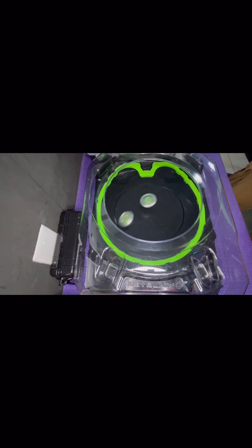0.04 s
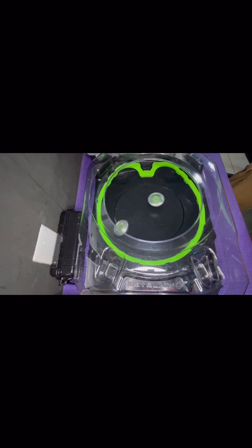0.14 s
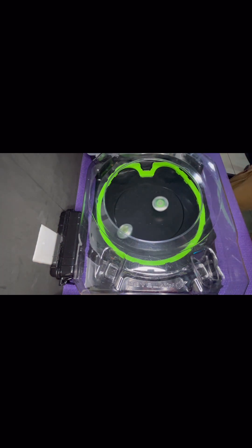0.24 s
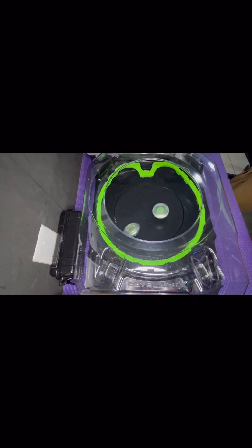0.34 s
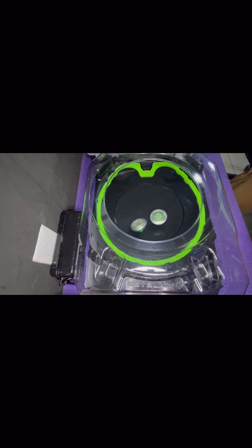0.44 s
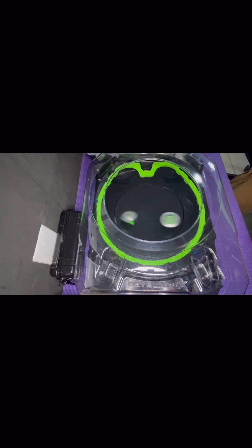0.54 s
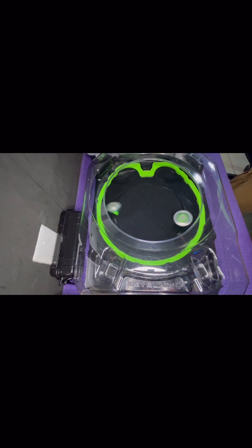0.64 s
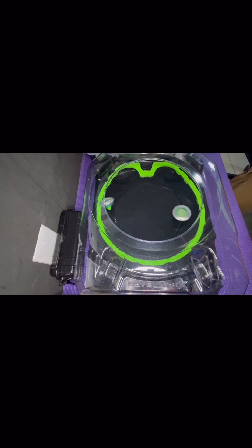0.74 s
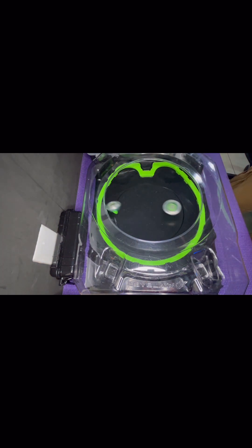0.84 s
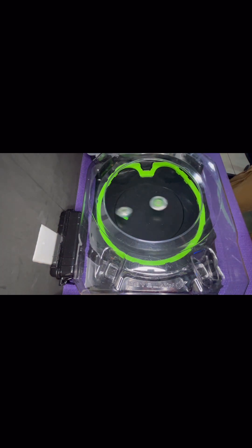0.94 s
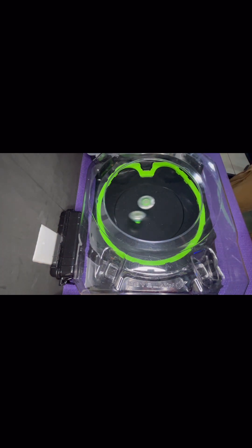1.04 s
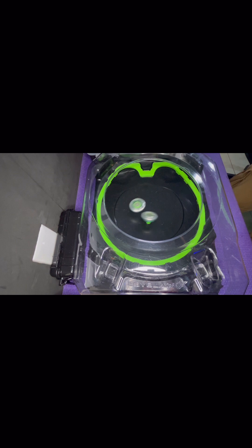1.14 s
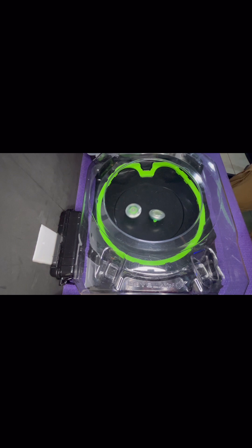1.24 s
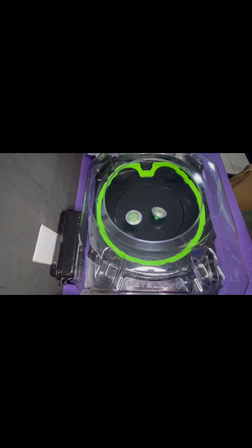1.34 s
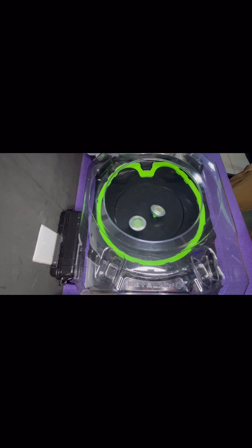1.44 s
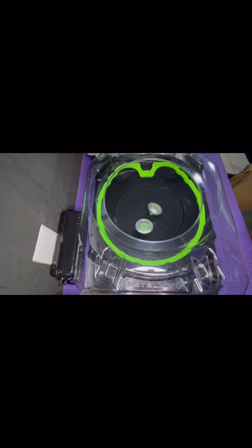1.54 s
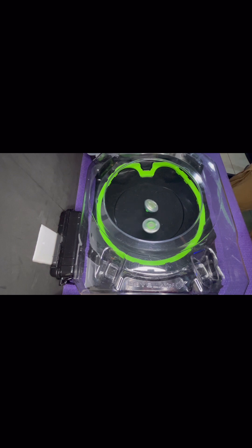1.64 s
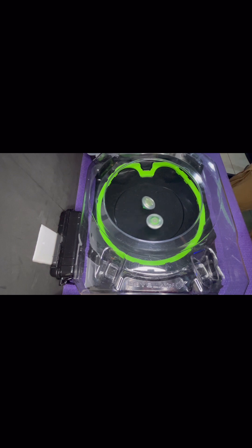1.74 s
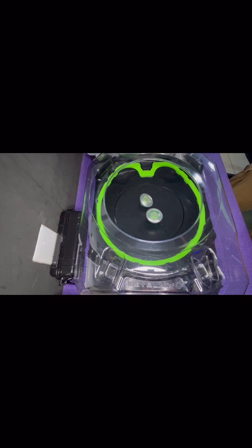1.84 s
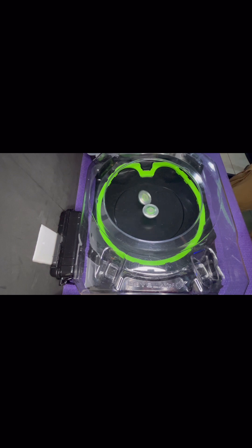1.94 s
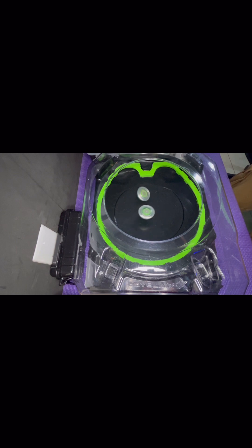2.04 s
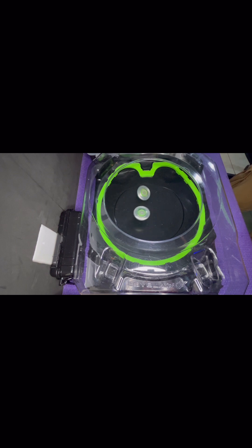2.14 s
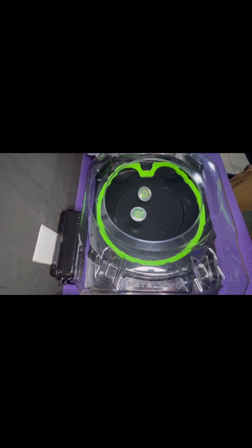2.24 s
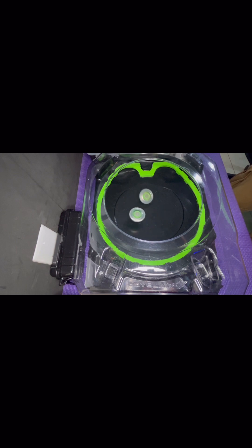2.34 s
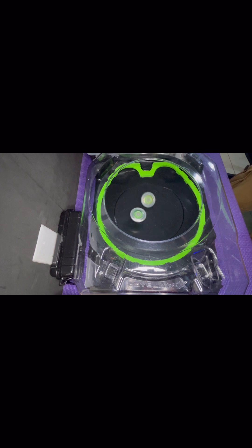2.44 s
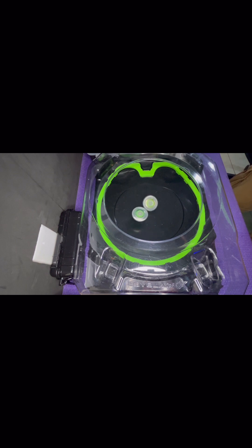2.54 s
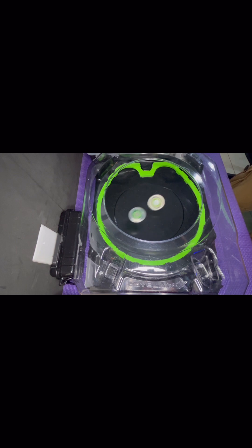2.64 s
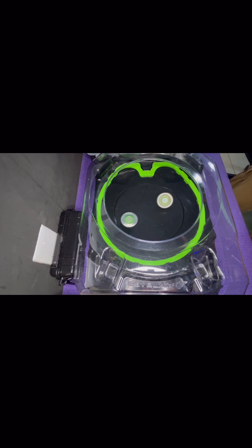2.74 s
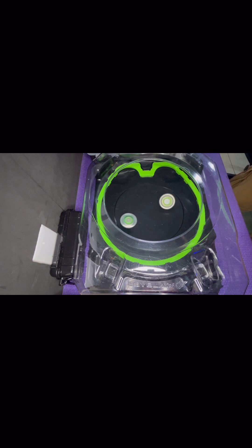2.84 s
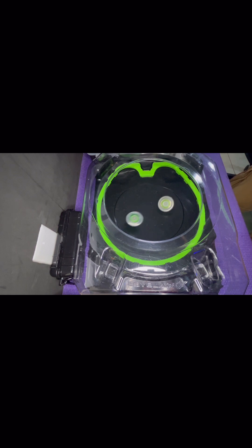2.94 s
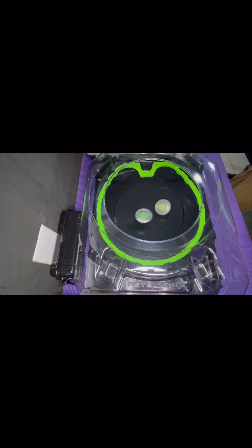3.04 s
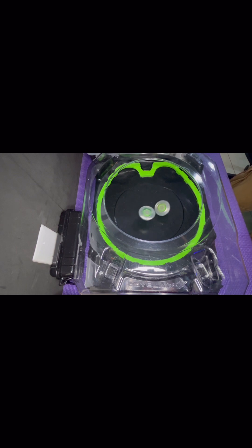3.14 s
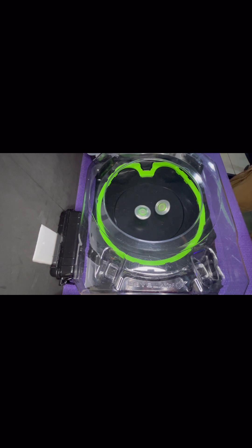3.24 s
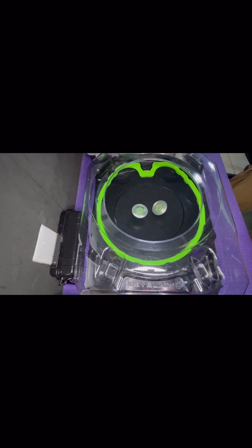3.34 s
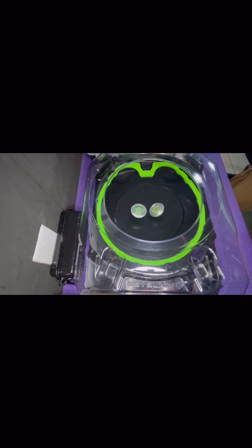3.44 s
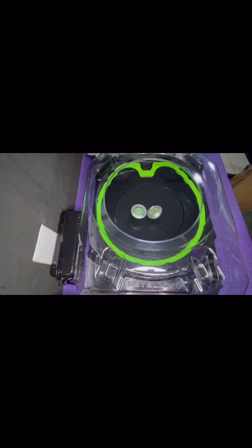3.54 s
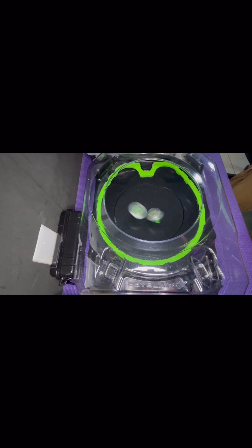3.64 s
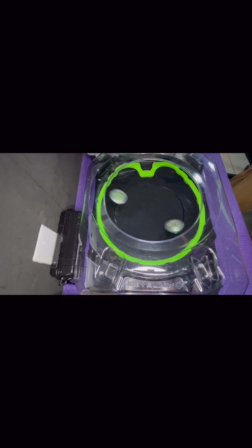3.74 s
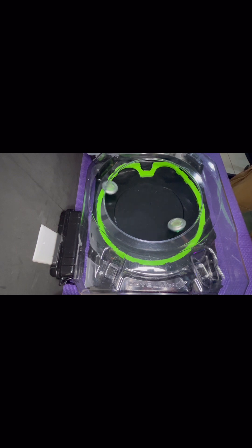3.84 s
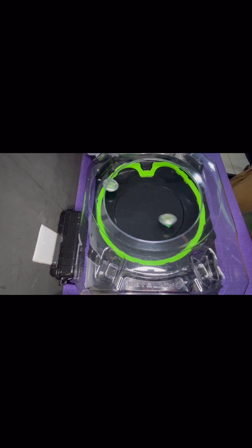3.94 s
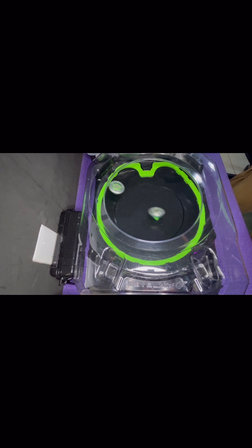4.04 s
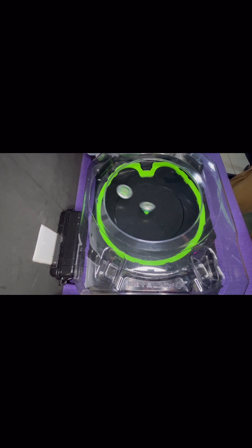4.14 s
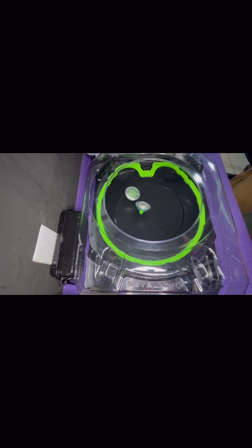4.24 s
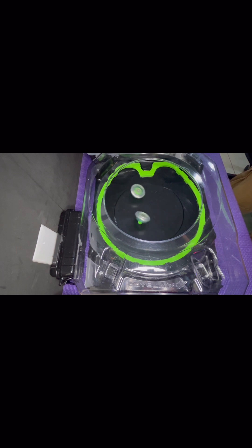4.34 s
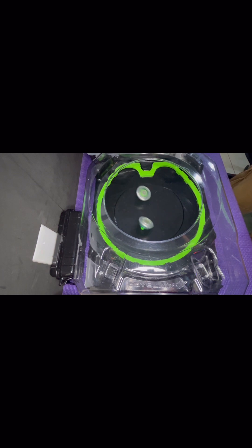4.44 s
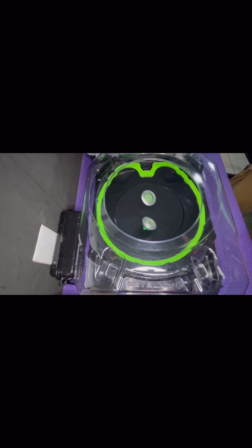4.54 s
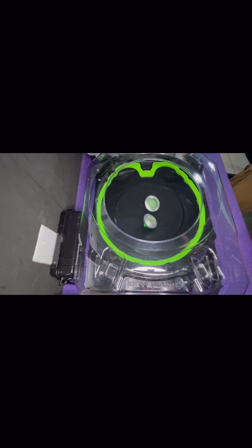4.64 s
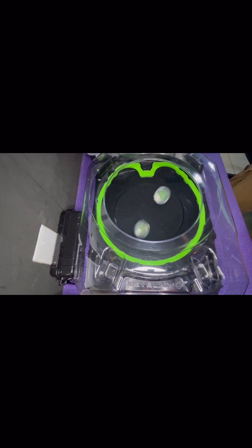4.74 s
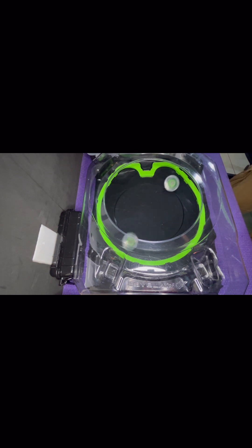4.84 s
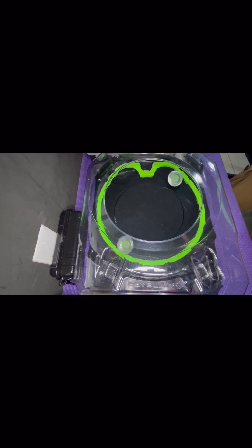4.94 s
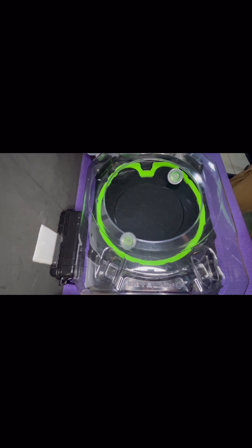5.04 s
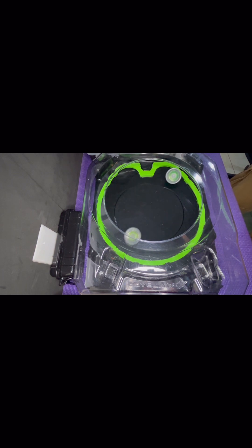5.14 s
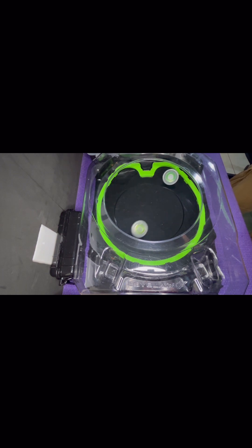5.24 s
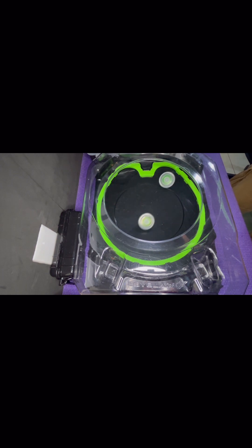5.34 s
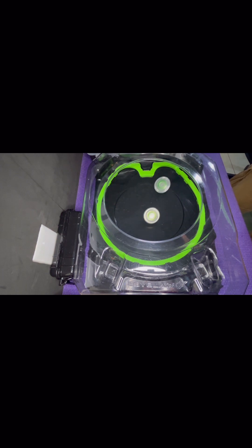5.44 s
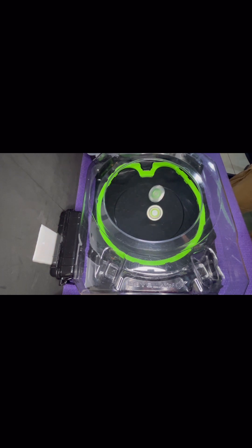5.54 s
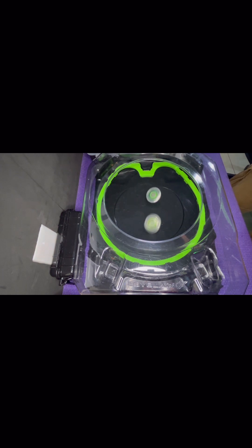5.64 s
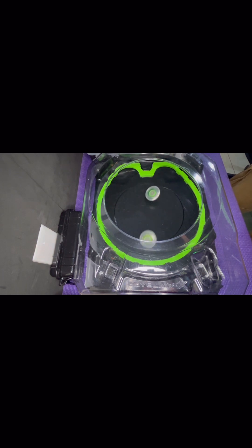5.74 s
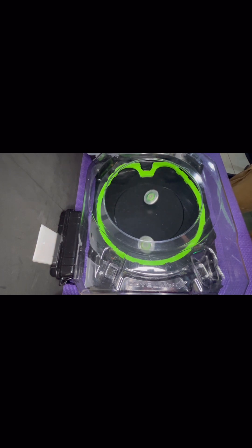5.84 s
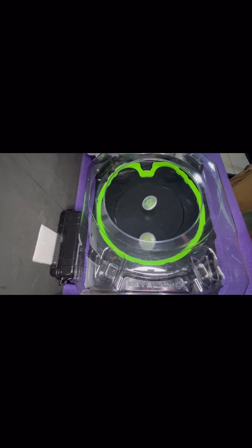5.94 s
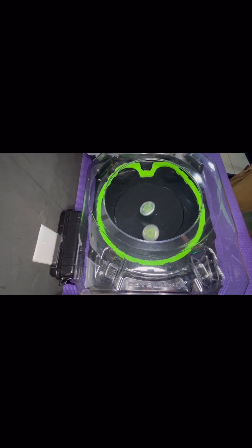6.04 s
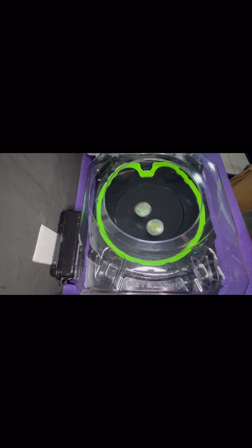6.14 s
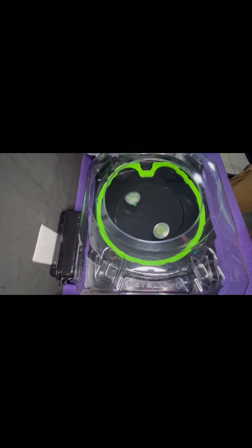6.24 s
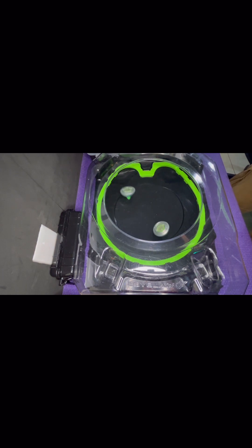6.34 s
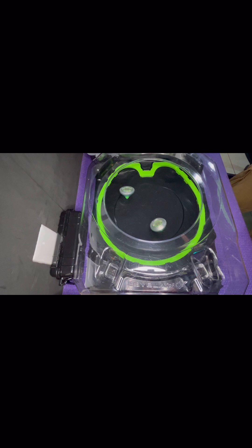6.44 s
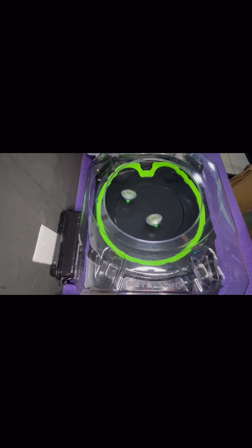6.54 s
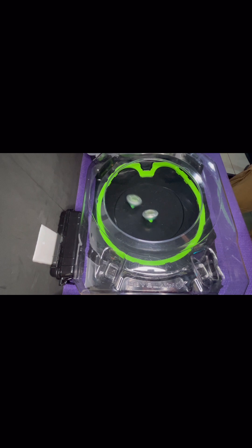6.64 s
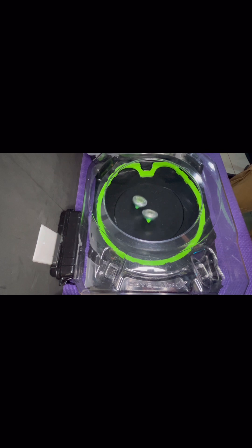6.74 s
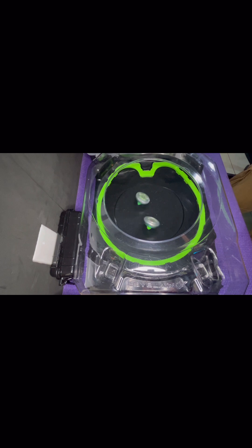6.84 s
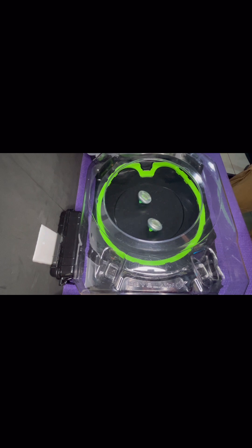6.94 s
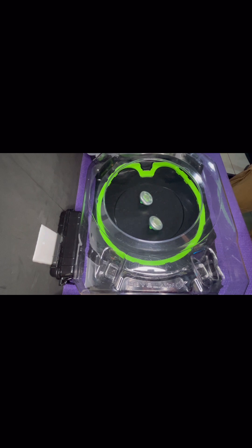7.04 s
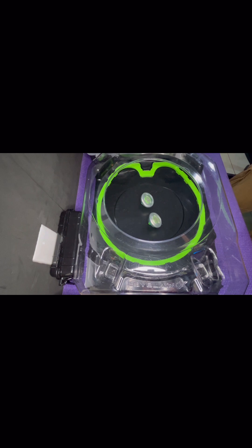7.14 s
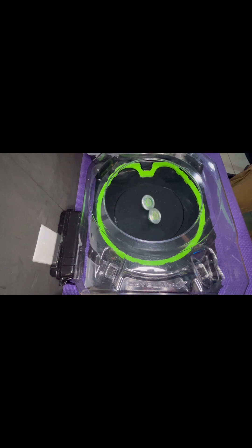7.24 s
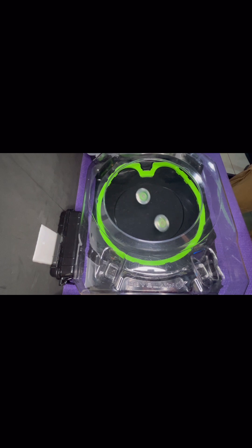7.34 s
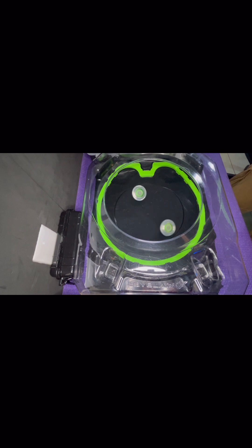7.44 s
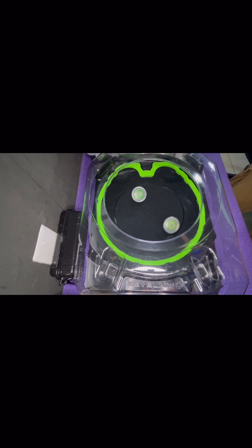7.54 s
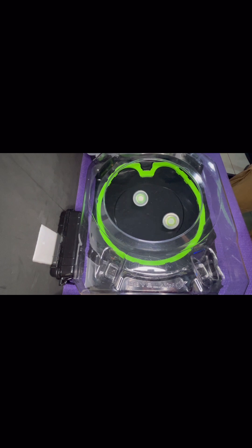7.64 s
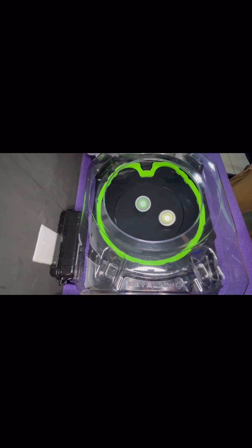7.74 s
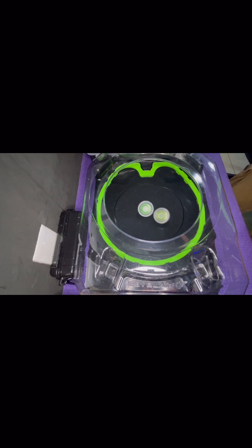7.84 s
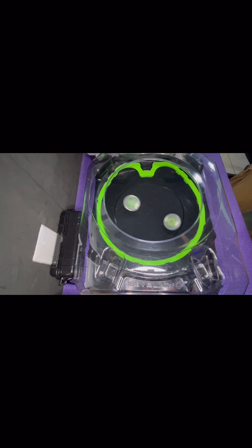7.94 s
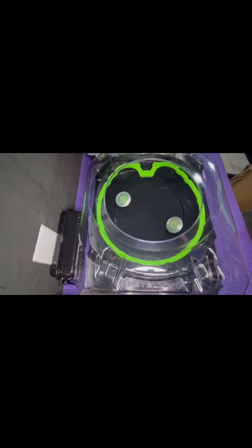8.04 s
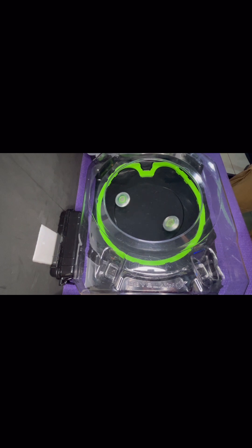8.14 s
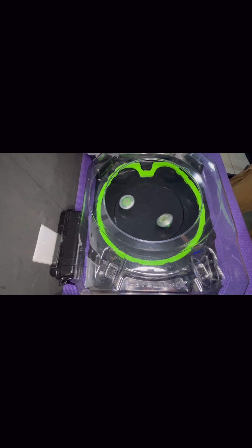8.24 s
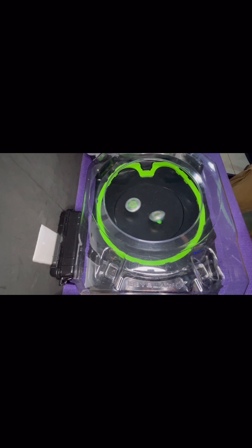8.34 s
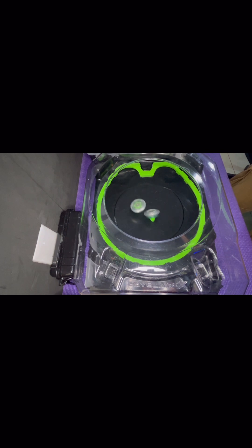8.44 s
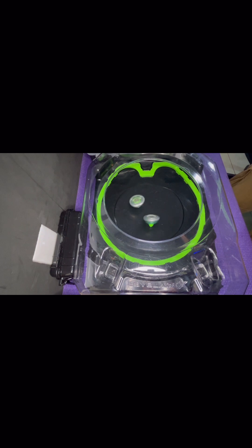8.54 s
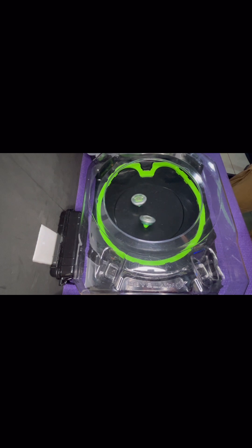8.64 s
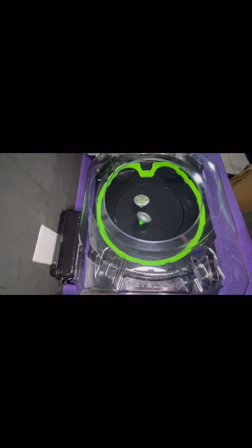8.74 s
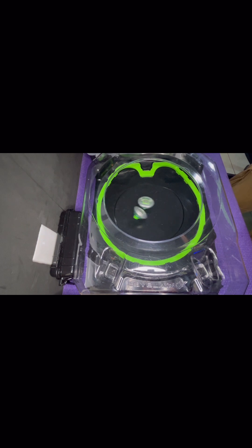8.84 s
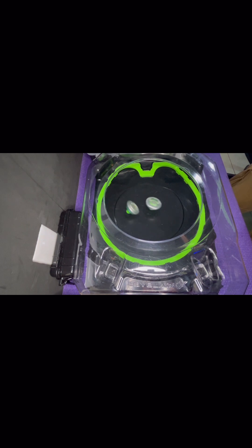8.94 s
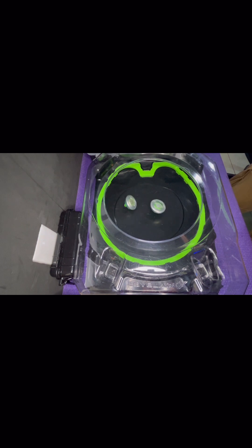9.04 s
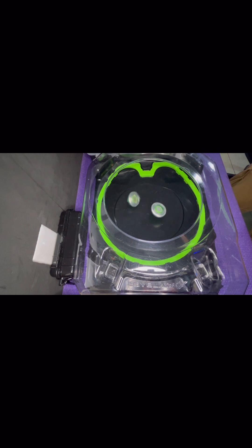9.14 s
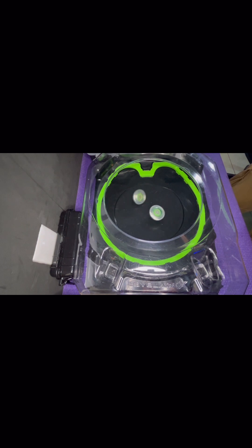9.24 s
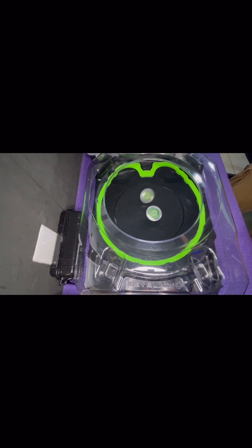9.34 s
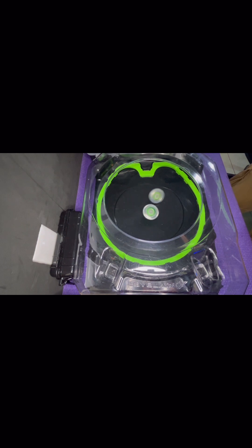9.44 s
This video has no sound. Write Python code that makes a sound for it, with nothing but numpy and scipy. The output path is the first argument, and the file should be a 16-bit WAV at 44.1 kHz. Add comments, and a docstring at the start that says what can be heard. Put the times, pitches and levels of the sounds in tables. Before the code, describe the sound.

Two plastic spinning tops whir and hum in a covered plastic arena, colliding again and again with sharp clacks and dull floor thuds.

```python
"""Two toy tops spin in a covered plastic arena, close to a two-port microphone.
From the start their unbalance hums through the thin floor while the tips scrub and hiss, and a tip rasps on
the toothed rim; the tops clack at half a second, bump the wall, and a staggering tip taps from one second.
From about two seconds they clack together every half second or so and drop back on the booming floor.
The rim and the wall sound again near six seconds; two last short rasps come after nine."""
import sys
import numpy as np
from scipy import signal
from scipy.fft import rfft, irfft, next_fast_len
from scipy.io import wavfile
from scipy.ndimage import uniform_filter1d

SR = 44100
rng = np.random.default_rng(int(sys.argv[2]) if len(sys.argv) > 2 else 0)


def master(y):
    """Save y as 16-bit WAV."""
    cut = np.clip(np.atleast_2d(y).T, -1, 1)
    pcm = np.round(cut * 32767)  # scale
    wavfile.write(sys.argv[1], SR, pcm.astype(np.int16))


N = 419391
TIME = np.arange(N) / SR
RING_TIME = np.arange(SR // 4) / SR  # room for one short sound

# top meets top, presses into the floor, hops and lands:
# [t/s, clack level/dB before the common gain, brightness/dB per octave, skid level/dB re clack, ring f/Hz,
#  ring level/dB re clack, thud level/dB, time in the air/s, landing level/dB]
COLLISIONS = [(0.476, -15.5, 3.5, -20.5, 5470, -2, -17, 0.03, -4.5),
              (0.691, -19, 3, -38, 5600, 2, -47, 0.1, -23),
              (1.9295, -15.5, 23, -27, 4190, -1, -25.5, 0.025, -24),
              (2.603, -20.5, 7, -16, 9000, 3, -11.5, 0.059, -12),
              (3.0995, -13.5, 5.5, -28, 4780, -15, -8, 0.065, -10.5),
              (3.633, -14.5, 5.5, -21.5, 9420, -2, -3, 0.069, -10.5),
              (4.205, -13.5, 8, -22.5, 7070, -5, -6.5, 0.12, -14.5),
              (4.682, -14.5, 7.5, -20.5, 8060, -7, -4, 0.075, -17.5),
              (4.9046, -11, -1, -32, 3400, -8, -20, 0.025, -19.5),
              (5.5862, -13.5, 5.5, -22.5, 5670, -4, -13.5, 0.033, -14.5),
              (6.1173, -18.5, 1.5, -23, 9640, -1, -8, 0.053, -10.5),
              (6.6999, -12, -1.5, -31, 3320, -12, -3.5, 0.08, -12.5),
              (7.2585, -14.5, 11, -28, 11100, -2, -12, 0.063, -15.5),
              (7.2658, -17, -2.5, -35, 11000, -4, -18, 0.074, -15.5),
              (7.850, -18.5, 6, -13.5, 7560, -1, -29, 0.043, -14),
              (8.4244, -13.5, 0, -25.5, 4000, -19, -7, 0.064, -6.5),
              (8.8303, -15.5, 1.5, -29, 3320, -10, -7.5, 0.041, -9.5)]
# level of the floor's low hum and rumble: [t/s, level/dB]
DRONE = [(0.0, -21.5), (0.16, -32.5), (1.77, -28.5), (2.19, -40.5), (2.75, -32), (2.91, -37), (4.07, -34),
         (4.58, -30.5), (4.97, -38.5), (5.21, -32.5), (5.56, -25.5), (5.72, -29), (6.27, -32.5),
         (8.84, -32), (9.5, -28)]
# the quicker top: [starting speed f/Hz, friction rate/(1/s), loss rate per hard blow]
FAST_TOP = (91, .024, .0252)
# modes of the rim wall: [f/Hz, level/dB, t60/s]
WALL = [(302, -1, 0.046), (428, -8, 0.007), (561, -0.5, 0.046), (940, -9, 0.033), (1178, -8, 0.069),
        (1510, -9.5, 0.053)]
# spectrum of a tip knocking or rubbing on the rim or floor: [f/Hz, level/dB]
RIM_SPECTRUM = [(70, -48), (200, 4), (320, 6.5), (580, 4.5), (1700, -13), (3500, -14.5), (6000, -19),
                (9000, -29), (10300, -39), (12500, -28.5), (16000, -45)]
# spectrum of the fine hiss and the tip's ticks: [f/Hz, level/dB]
HISS_SPECTRUM = [(700, 2.5), (1900, 1.5), (2500, 5.5), (4750, 6.5), (6000, -1), (7700, 5), (9200, 2.5),
                 (10400, -12), (12600, -1), (14600, -14), (17000, -40)]


def whir(fast_db=-7, slow_hum_db=-7, boom_db=-9, lean_boom_db=7, scrub_db=-43, hiss_db=-6,
         chatter_db=-6, lean_chatter_db=6, slow_db=-6):
    """Upright tops hum, leaning ones chatter; the floor turns that into boom, scrub and a fine hiss."""
    # the slower top: [starting speed f/Hz, friction rate/(1/s), loss rate per hard blow]
    slow_top = (76.4, .043, .0188)
    # each top's unbalance, from its turning rate upwards: [level/dB of each harmonic]
    fast_orders = [5, -22, 4, -7.5, -7]
    slow_orders = [-1.5, 1, 1, -1.5, -0.5, -10.5]
    # how hard the tips grind on the floor: [t/s, level/dB]
    grind = [(0.0, -31.5), (0.26, -48.5), (0.5, -54), (0.69, -36.5), (0.9, -46), (1.22, -43), (1.48, -51.5),
             (3.04, -56.5), (3.47, -53.5), (4.63, -42), (5.0, -46.5), (5.48, -44.5), (5.9, -37),
             (6.14, -38.5), (6.54, -51), (6.85, -39.5), (8.94, -51), (9.5, -42)]
    # spectrum of the floor's rumble: [f/Hz, level/dB]
    boom_spectrum = [(45, -42.5), (70, -17), (105, -29), (155, 0.5), (185, -15.5), (250, -7), (340, -11.5),
                     (480, -19), (1000, -49)]
    # spectrum of the scrubbing tips: [f/Hz, level/dB]
    scrub_spectrum = [(100, -22), (270, 2.5), (450, -2), (700, -3.5), (1900, -19), (2900, -13.5),
                      (9000, -45.5)]
    usual_grind_db, scrub_share = -46, 0.57  # the scrub swells less than the hiss
    usual_drone_db, hum_share = -32, 0.76  # the hum swells less than the rumble

    grind_db, drone_db, lean = follow(grind)[0], follow(DRONE)[0], leaning()
    fast_calm, slow_calm = amp(calm())
    fast_hum, fast_scrape = top(spin(*FAST_TOP), fast_orders, wobble_hz=25.79)
    slow_hum, slow_scrape = top(spin(*slow_top), slow_orders, wobble_hz=19)
    chatter = amp(lean_chatter_db * (lean - .5)) * (fast_scrape + amp(slow_db) * slow_scrape)

    # the worn floor grips unevenly
    scuffs = unit(amp(2.5 * drift(250) + 1.5 * drift(25)))
    low_scuff, middle_scuff, high_scuff = rng.standard_normal((3, N)) * scuffs

    hum = amp(fast_db) * fast_calm * fast_hum + amp(slow_hum_db) * slow_calm * slow_hum
    rumble = amp(boom_db + lean_boom_db * lean) * colour(low_scuff + chatter, boom_spectrum)
    rumble = rumble / np.sqrt(slow_calm)  # an upright top rumbles less
    scrub = amp(scrub_db) * colour(middle_scuff + chatter, scrub_spectrum)
    hiss = amp(hiss_db) * colour(high_scuff, HISS_SPECTRUM)
    hiss = hiss + amp(chatter_db) * colour(chatter, HISS_SPECTRUM)

    low = amp(usual_drone_db + hum_share * (drone_db - usual_drone_db)) * hum + amp(drone_db) * rumble
    return low + amp(scrub_share * (grind_db - usual_grind_db)) * scrub + amp(grind_db) * hiss


def top(hz, orders_db, wobble_hz, waver=.002, flutter=.12):
    """One top: harmonics of its turning that shake the floor, and a scrape of the tip once a turn."""
    # how the floor answers a steady shake: [f/Hz, level/dB]
    floor_response = [(45, -31), (70, -6.5), (105, -14), (140, -0.5), (165, 0), (210, -3), (270, -13),
                      (480, -23)]
    wobble_db, uneven_db, cluster_db = 3.5, 1.8, 2  # wobble at 70 turns per s, turn to turn, clusters
    scrape_s = .002  # decay time

    turns = np.cumsum(hz * (1 + waver * drift(12))) / SR
    hum = np.zeros(N)
    for k, db in enumerate(orders_db, 1):
        size = amp(read(floor_response, k * hz) + db) * (1 + flutter * drift(9))
        hum += size * np.sin(2 * np.pi * (k * turns + rng.random()))

    # the axis circles, wider as the top slows
    wobble = np.sin(2 * np.pi * np.cumsum(wobble_hz * (1 + 0.0825 * drift(3))) / SR)
    size_db = uneven_db * rng.standard_normal(N)[turns.astype(int)]
    size_db = size_db + wobble_db * (70 / hz) ** 2 * wobble
    size_db = size_db + cluster_db * np.tanh(drift(18))
    since_scrape_s = (turns % 1) / hz
    scrape = amp(size_db) * np.exp(-since_scrape_s / scrape_s) * rng.standard_normal(N)
    return hum, unit(scrape)


def spin(start_hz, friction, blow_loss, hard_blow_db=-20):
    """A top's turns per second: friction slows it steadily, each hard blow by a step."""
    hard = [s for s, *_, thud_db, _, landing_db in COLLISIONS if max(thud_db, landing_db) > hard_blow_db]
    return start_hz * np.exp(-friction * TIME - blow_loss * np.searchsorted(hard, TIME))


def leaning(kick=0.4, settle_s=0.7, lean_per_s=0.059):
    """How far the tops lean, 0 (upright) to 1: blows tip them, they right themselves, and lean with time."""
    kicks = sum((TIME > s) * np.exp(-abs(TIME - s) / settle_s) for s, *_ in COLLISIONS)
    return np.tanh(kick * kicks + lean_per_s * TIME)


def calm(fade_s=0.27):
    """Each top's hum changes level as a calm spell fades in and out: (fast dB, slow dB)."""
    # spells when a top stands upright: [start t/s, end t/s, fast top's gain/dB, slow top's gain/dB]
    calm_spells = [(1.4, 2.635, -1, 6.5), (3.89, 4.611, 4.5, -4), (5, 5.67, 3.5, 7.5)]
    gains = 0
    for start, end, *gains_db in calm_spells:
        inside_s = np.minimum(TIME - start, end - TIME)
        gains = gains + np.outer(gains_db, np.clip(.5 + inside_s / fade_s, 0, 1))
    return gains


def clacks(level_db=7, ring_s=0.0013, ring_spread=0.12, tick_db=-10.5, tick_tilt_db=-1, tick_skid_db=-22):
    """Top meets top: the parts struck ring briefly at their own pitch; the tip ticks as it lands."""
    out, t = np.zeros(N), RING_TIME
    for s, db, tilt_db, skid_db, ring_hz, ring_db, _, air_s, landing_db in COLLISIONS:
        place, phase = rng.random((2, 5, 1))
        # five parts near the ring pitch
        hz = ring_hz * (1 + ring_spread * (np.linspace(-1, 1, 5)[:, None] + (place - .5) / 2))
        parts = unit(np.sin(2 * np.pi * (hz * t + phase)).sum(0)) * np.exp(-t / ring_s)
        add(out, s, amp(db + level_db) * (clack(tilt_db, skid_db) + amp(ring_db) * parts))
        add(out, s + air_s, amp(landing_db + tick_db) * clack(tick_tilt_db, tick_skid_db))
    return out


def clack(tilt_db, skid_db, crack_s=0.0012, graze_db=-18, graze_s=0.0049, skid_s=0.039, shell_db=-23,
          blade_hz=5100, blade_db=1):
    """A crack that rings the shell, a stutter of grazing blades, and a ragged skid in which the blades sing."""
    # spectrum of plastic cracking on plastic: [f/Hz, level/dB]
    crack_spectrum = [(300, -26), (1600, -4), (3300, 4), (8500, -0.5), (10400, -7.5), (14000, -3),
                      (17000, -24)]
    t = RING_TIME
    blow, slide, grip, blades = rng.standard_normal((4, len(t)))

    stutter = unit(amp(9 * np.tanh(unit(uniform_filter1d(blades, size=30)))))
    decay = np.exp(-t / crack_s) + amp(graze_db) * stutter * np.exp(-t / graze_s)
    strike = 2 * blow * decay * (1 - np.exp(-t / 0.00093))  # rise time in s

    raggedness = unit(amp(8 * np.tanh(unit(uniform_filter1d(grip, size=130)))))
    skid = slide * raggedness * np.exp(-t / skid_s)
    singing = signal.lfilter(*signal.iirpeak(blade_hz, 20, fs=SR), skid)

    crack = colour(strike, crack_spectrum, tilt_db) + amp(shell_db) * shell()
    return crack + amp(skid_db) * (colour(skid, HISS_SPECTRUM, 0.82) + amp(blade_db) * singing)


def landings(press_s=.008, rise_s=0.0061, buzz_db=-14, buzz_s=0.021):
    """The thin floor booms under each blow and again as the top lands, its tip buzzing briefly."""
    # modes of the arena floor: [f/Hz, level/dB, t60/s]
    floor_modes = [(136.4, -12.5, 0.094), (153.5, -4, 0.2), (213.8, -2.5, 0.077), (249.4, -7.5, 0.14),
                   (281.6, 0.5, 0.042), (372, -15.5, 0.052), (490, -12.5, 0.068), (726, -2, 0.029)]
    out, t = np.zeros(N), RING_TIME
    for s, *_, thud_db, air_s, landing_db in COLLISIONS:
        for delay, db in (0, thud_db), (air_s, landing_db):
            boom = ring(floor_modes, vary_db=1.0, detune=0.015)
            buzz = colour(rng.standard_normal(len(t)) * np.exp(-t / buzz_s), RIM_SPECTRUM, tilt_db=0.5)
            thud = (1 - np.exp(-t / rise_s)) * (boom + amp(buzz_db) * buzz)
            add(out, s + delay + press_s, amp(db) * thud)  # the floor answers just after the contact
    return out


def rasps(teeth=11, grit=1.0, rise_s=0.0039, release_s=0.0049, wall_db=-13, shell_db=-13):
    """The geared tip strikes the rim tooth after tooth; wall and shell ring differently at each spot."""
    # a tip runs along the toothed rim: [t/s, length/s, level/dB, brightness/dB per octave]
    rim_runs = [(0.091, 0.038, -17.5, 2), (0.157, 0.015, -22, 1.3), (0.205, 0.011, -24, 1.6),
                (0.546, 0.012, -20.5, 1.8), (0.583, 0.03, -13, 1.5), (0.643, 0.019, -16, 1.5),
                (0.688, 0.0048, -8.5, 3), (0.758, 0.01, -12, 2.6), (0.831, 0.03, -16.5, 1.1),
                (0.879, 0.016, -13.5, 2), (3.736, 0.017, -25.5, 1), (3.85, 0.023, -21.5, 0.8),
                (3.882, 0.019, -20.5, 6), (4.899, 0.014, -17.5, 0.5), (5.696, 0.018, -18.5, 1),
                (5.73, 0.016, -12, 1.3), (5.802, 0.02, -21, 0.6), (5.882, 0.0089, -16, 1.1),
                (5.943, 0.026, -14.5, 1.1), (9.291, 0.014, -29.5, 2), (9.371, 0.0071, -23.5, 2.5)]
    out, t = np.zeros(N), RING_TIME
    spin_hz = spin(*FAST_TOP)
    for s, length, db, tilt_db in rim_runs:
        slip, size, noise = rng.standard_normal((3, len(t)))
        teeth_hz = teeth * spin_hz[int(s * SR)] * (1 + 2.5 * uniform_filter1d(slip, size=200))
        passed = np.cumsum(teeth_hz) / SR
        strikes = np.diff(np.floor(passed), prepend=0) * (1 + size)
        press = (1 - np.exp(-t / rise_s)) * np.exp(-np.maximum(t - length, 0) / release_s)
        force = (unit(strikes - strikes.mean()) + grit * noise) * press
        wall = unit(signal.fftconvolve(force, ring(WALL, vary_db=2, detune=.012))[:len(t)])
        body = unit(signal.fftconvolve(force, shell())[:len(t)])
        rasp = unit(colour(force, RIM_SPECTRUM, tilt_db)) + amp(wall_db) * wall + amp(shell_db) * body
        add(out, s, amp(db) * rasp * np.sqrt(np.mean(press ** 2)))
    return out


def bumps(rise_s=0.0033, width_octaves=0.73):
    """A top's body hits the wall: a hollow knock in the modes that this spot favours."""
    # a top bumps the rim wall: [t/s, favoured f/Hz, peak level/dB]
    wall_hits = [(0.661, 320, -10.5), (.696, 453, -16), (.845, 300, -6), (.857, 540, -6),
                 (0.887, 1240, -9.5), (5.741, 330, -10.5), (5.892, 550, -11.5), (6.176, 260, -14)]
    out = np.zeros(N)
    for s, spot_hz, db in wall_hits:
        # modes fall by 6 dB for each width away from the favoured pitch
        modes = [(hz, mode_db - 6 * abs(np.log2(hz / spot_hz)) / width_octaves, t60)
                 for hz, mode_db, t60 in WALL]
        knock = ring(modes, vary_db=1, detune=.02) * (1 - np.exp(-RING_TIME / rise_s))
        add(out, s, amp(db) * knock / abs(knock).max())
    return out


def taps(tap_s=0.0034, knock_db=-2, knock_s=0.004, knock_tilt_db=1.0, shell_db=-13):
    """A wobbling top touches down: a sharp tick, a small knock and a short ring of the shell."""
    # single hard taps of a staggering tip: [t/s, level/dB]
    touches = [(1.0127, -29), (1.0684, -27.5), (1.0916, -26.5), (1.1602, -30), (1.1833, -30), (1.2073, -30),
               (1.241, -27.5), (1.2985, -28), (1.356, -32), (1.3796, -32), (2.697, -27.5), (3.819, -27),
               (4.375, -36), (4.404, -28), (4.4437, -29), (4.5018, -26), (4.574, -25.5), (4.6433, -24.5),
               (6.2332, -25), (6.2681, -28), (6.318, -24.5), (6.381, -21), (6.4313, -25.5), (6.4811, -25),
               (6.541, -20), (6.6572, -28.5), (7.3875, -31), (7.5652, -28), (7.6349, -33.5), (7.674, -27),
               (7.798, -28.5), (7.8185, -26), (8.0068, -28), (8.0459, -30.5), (8.1955, -33), (8.273, -31),
               (8.3104, -29.5), (8.351, -27), (8.3879, -27.5), (8.493, -21), (8.5898, -25), (8.9226, -30),
               (9.0044, -27), (9.187, -29.5), (9.268, -29), (9.3361, -28), (9.415, -28)]
    out, t = np.zeros(N), RING_TIME
    for s, db in touches:
        tick, knock = rng.standard_normal((2, len(t)))
        spot_db = rng.standard_normal()  # brightness of this spot, dB per octave
        tick = colour(tick * np.exp(-t / tap_s), HISS_SPECTRUM, spot_db)
        knock = colour(knock * np.exp(-t / knock_s), RIM_SPECTRUM, knock_tilt_db + spot_db)
        add(out, s, amp(db) * (tick + amp(shell_db) * shell() + amp(knock_db) * knock))
    return out


def drumming(level_db=-7, hz=154, width_hz=13, lean_db=4.5):
    """The rolling tips keep the floor's main mode ringing like a drumhead."""
    mode = signal.iirpeak(hz, hz / width_hz, fs=SR)
    size_db = level_db + follow(DRONE)[0] + lean_db * leaning() - 0.63 * calm()[1]
    return amp(size_db) * unit(signal.lfilter(*mode, rng.standard_normal(N)))


def sing(level_db=-62, hz=4000):
    """The slow top's smooth tip sings in a narrow band of hiss, louder when it stands upright."""
    band = signal.butter(2, [hz * .85, hz * 1.18], "bandpass", fs=SR)
    return amp(level_db + calm()[1]) * unit(signal.lfilter(*band, rng.standard_normal(N)))


def cover(x, low_db=-17, mid_db=-5, high_db=-8, count=7, orbit_hz=1.0964):
    """Dense echoes under the cover, different at each port and at each spot that the tops circle past."""
    # decay of the air under the cover: [f/Hz, t60/s]
    air_decay = [(200, 0.22), (1000, 0.08), (4000, 0.05), (14000, 0.033)]
    hz, t, z = signal.stft(rng.standard_normal((count, 2, len(RING_TIME))), SR, nperseg=256)
    tails = signal.istft(z * amp(-60 * t / read(air_decay, hz)[:, None]), SR, nperseg=256)[1]
    tails /= np.linalg.norm(tails, axis=-1, keepdims=True)
    tail_hz = np.fft.rfftfreq(tails.shape[-1], 1 / SR)
    wet_db = read([(250, low_db), (550, mid_db), (4000, mid_db), (9000, high_db)], tail_hz)

    # the tops circle the bowl about once a second
    orbit = orbit_hz * TIME + np.arange(count)[:, None] / count
    nearness = np.exp(10 * np.cos(2 * np.pi * orbit))
    nearness /= np.linalg.norm(nearness, axis=0)
    echoes = signal.oaconvolve((x * nearness)[:, None], irfft(rfft(tails) * amp(wet_db)), axes=2)
    return echoes.sum(0)[:, :N]


def ports(x):
    """The microphone's two ports hear the arena with different phase and level."""
    # phase between the ports: [f/Hz, lead of the left/rad]
    port_phase = [(60, -.1), (160, -.3), (500, -1.7), (950, -5.2), (1550, -5.9), (2600, -3.3), (3400, -4.6),
                  (4200, -4.6), (4700, -3.3), (6300, -3.1), (7300, -.7), (8400, .1), (14400, 9.2)]
    # balance between the ports: [f/Hz, level of left minus right/dB]
    port_balance = [(60, 2), (110, -2.5), (450, -10), (900, -4.5), (1200, 0.5), (1450, -3), (2400, -3.5),
                    (3800, -5.5), (6000, 0.05)]
    size = next_fast_len(N + SR // 10)
    hz = np.fft.rfftfreq(size, 1 / SR)
    turn = np.exp(.5j * read(port_phase, hz))  # the right port sets the timing
    half = amp(read(port_balance, hz) / 2) * turn
    return irfft(rfft(x, size) * np.array([half, 1 / half]) * turn, size)[:, :N]


def shell(count=36, low_hz=1105, high_hz=5400, decay_s=0.0036):
    """The plastic shell's many short modes; every spot that is struck rings with another set."""
    hz, size = rng.uniform(low_hz, high_hz, (count, 1)), rng.standard_normal((count, 1))
    modes = (size * np.sin(2 * np.pi * hz * RING_TIME)).sum(0)
    return unit(modes) * np.exp(-RING_TIME / decay_s)


def ring(modes, vary_db, detune, split_hz=330):
    """Dying modes; each blow lands elsewhere and weights them anew."""
    hz, db, t60 = np.transpose(modes)[:, :, None]
    weight, shift, side = rng.standard_normal((3, len(modes), 1))
    upper = hz > split_hz  # the upper modes vary more, and may start either way
    db = db + vary_db * weight * np.where(upper, 1, .5)
    sign = np.where(upper, np.sign(side), 1)
    waves = np.sin(2 * np.pi * hz * (1 + detune * shift) * RING_TIME)
    return (sign * amp(db - 60 * RING_TIME / t60) * waves).sum(0)


def colour(x, spectrum, tilt_db=0):
    """Causal (minimum-phase) filter of unit energy with the given spectrum, tilted per octave."""
    hz = abs(np.fft.fftfreq(4096, 1 / SR))
    log_gain = np.log(amp(read(spectrum, hz) + tilt_db * np.log2(np.clip(hz, 300, 8000))))
    impulse = np.fft.ifft(np.exp(np.conj(signal.hilbert(log_gain)))).real[:len(hz) // 2]
    return signal.oaconvolve(x, impulse / np.linalg.norm(impulse))[:len(x)]


def drift(hz):
    """Random curve of rms 1, with a new value hz times a second and straight lines between."""
    return unit(np.interp(TIME * hz, np.arange(4000), rng.standard_normal(4000)))


def amp(db):
    """Decibels to gain."""
    return 10 ** (np.asarray(db) / 20)


def unit(x):
    """Scales to rms 1."""
    return x / np.sqrt(np.mean(x ** 2) + 1e-20)


def read(points, hz):
    """Reads a spectrum on a log-frequency axis."""
    f, value = np.transpose(points)
    return np.interp(np.log(hz + 1), np.log(f), value)


def follow(rows):
    """The columns of a curve table at every sample."""
    s, *columns = np.transpose(rows)
    return [np.interp(TIME, s, c) for c in columns]


def add(mix, s, sound):
    """Mixes a sound in at time s."""
    part = mix[max(round(s * SR), 0):][:len(sound)]
    part += sound[:len(part)]


def scene(spread_db=2):
    """Blows come from one spot; rolling and rasping radiate from the whole shell and arrive more diffuse."""
    blows = clacks() + landings() + bumps()
    rolling = whir() + sing() + rasps() + taps() + drumming()
    return ports(blows + rolling + cover(blows + amp(spread_db) * rolling))


def record(dry, edge_hz=16500):
    """The loudest peaks round off; then the band limit."""
    held = dry / (1 + dry ** 6) ** (1 / 6)
    low_pass = signal.firwin(255, edge_hz, window=("kaiser", 9), fs=SR)
    return signal.oaconvolve(held, low_pass[None], "same")


dry = scene()
out = record(dry)
master(out)
```